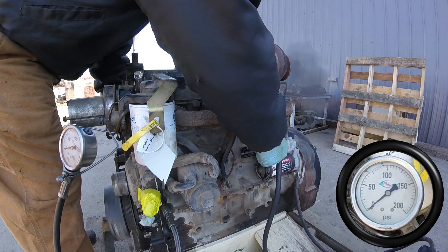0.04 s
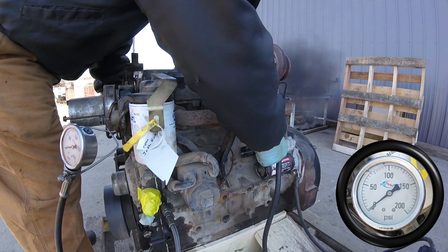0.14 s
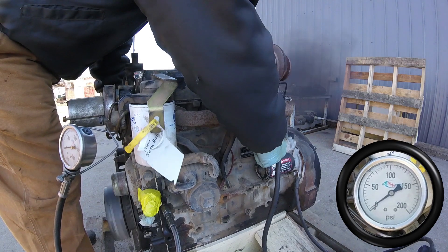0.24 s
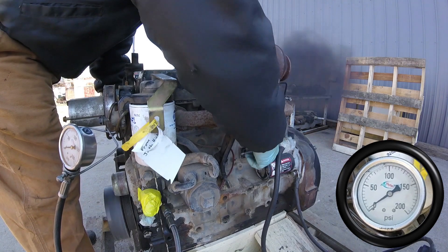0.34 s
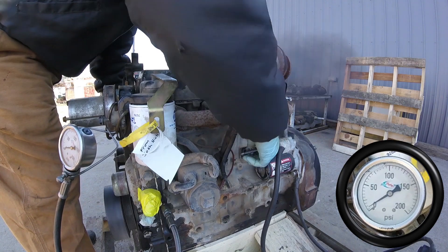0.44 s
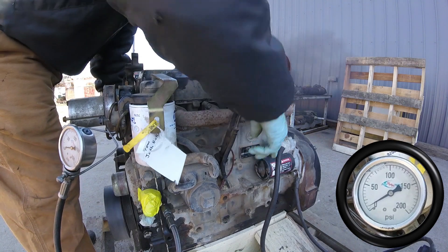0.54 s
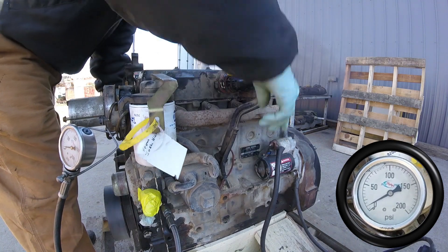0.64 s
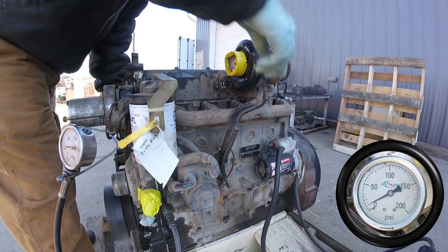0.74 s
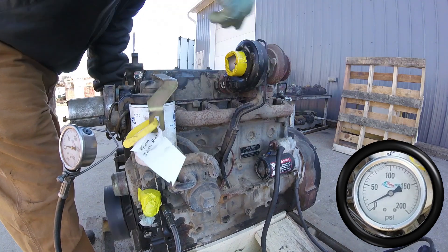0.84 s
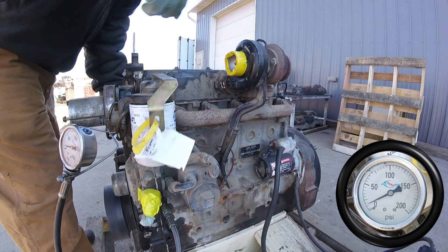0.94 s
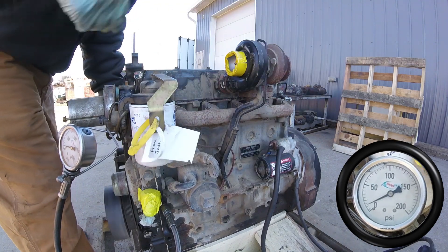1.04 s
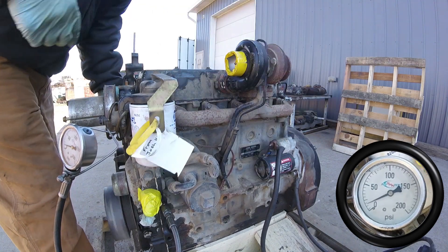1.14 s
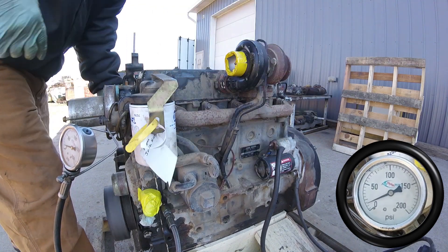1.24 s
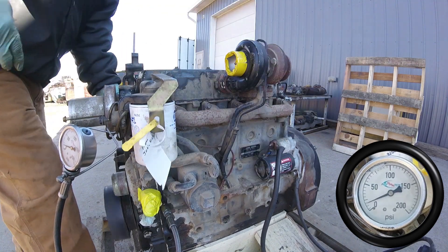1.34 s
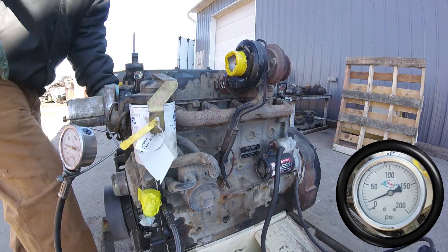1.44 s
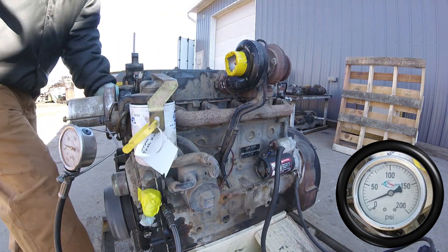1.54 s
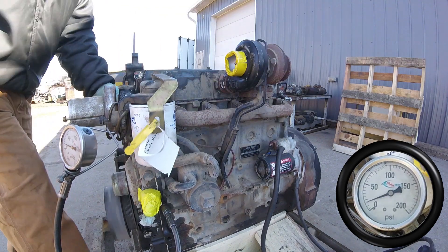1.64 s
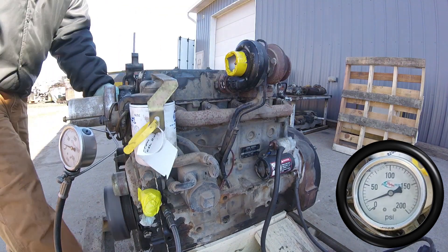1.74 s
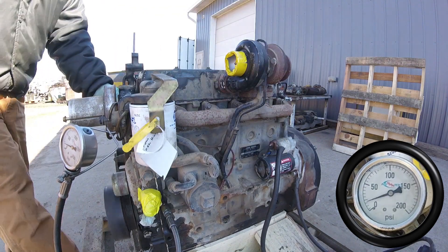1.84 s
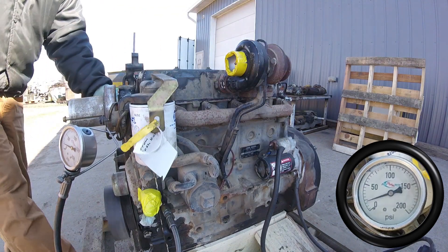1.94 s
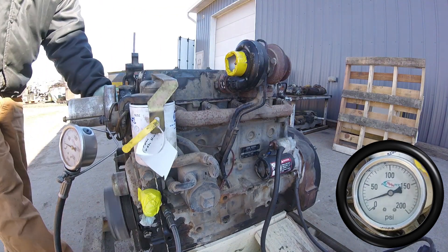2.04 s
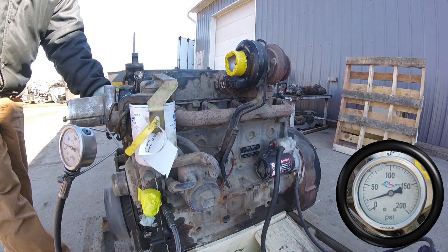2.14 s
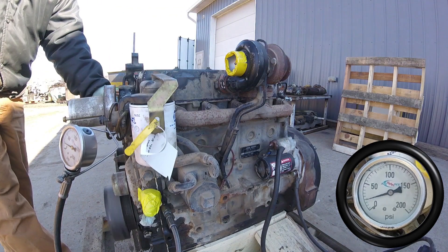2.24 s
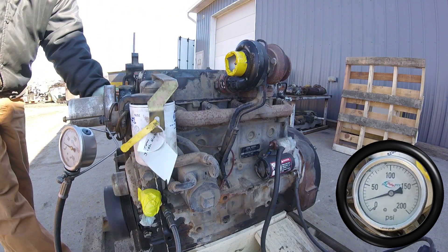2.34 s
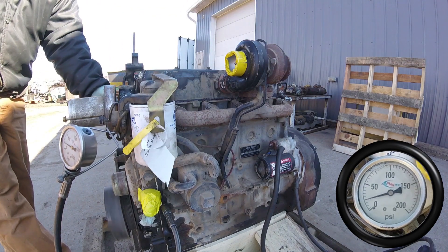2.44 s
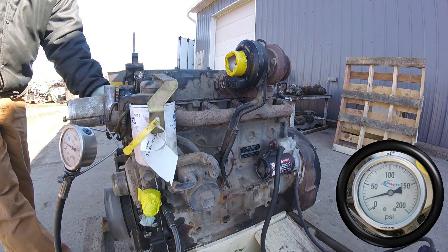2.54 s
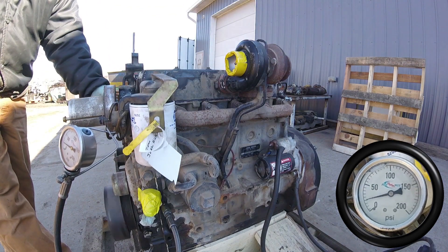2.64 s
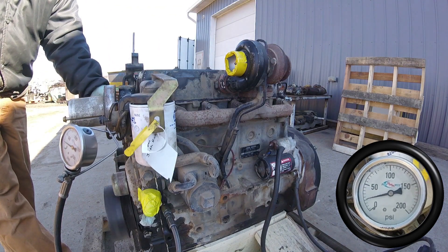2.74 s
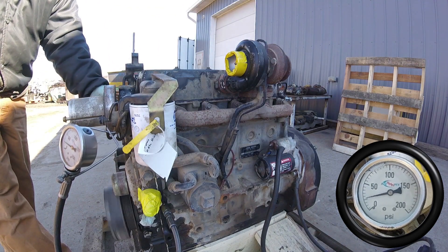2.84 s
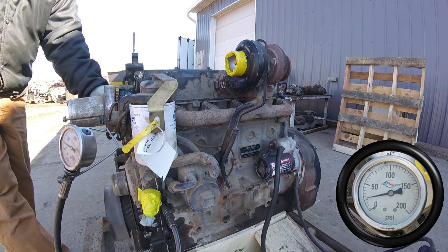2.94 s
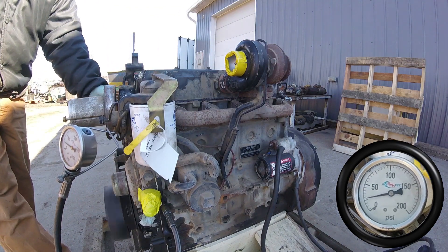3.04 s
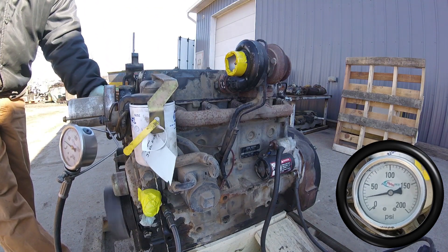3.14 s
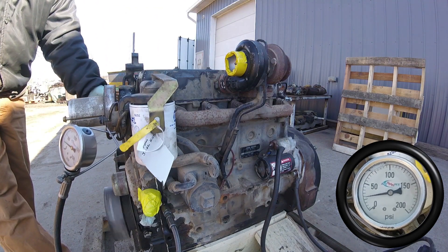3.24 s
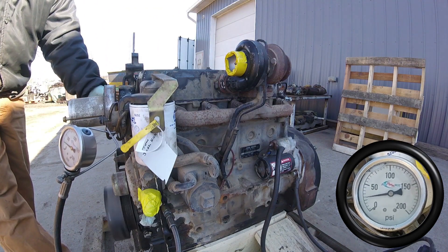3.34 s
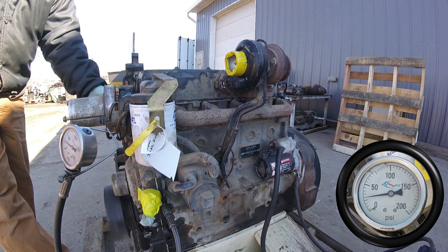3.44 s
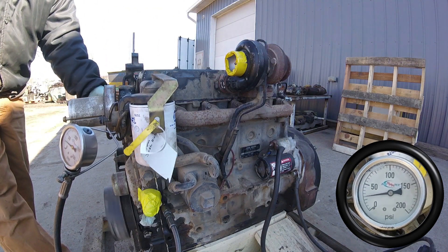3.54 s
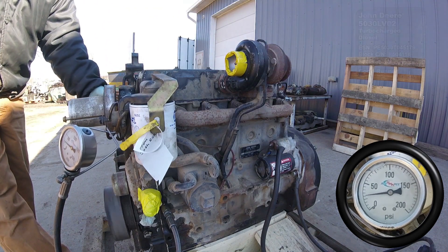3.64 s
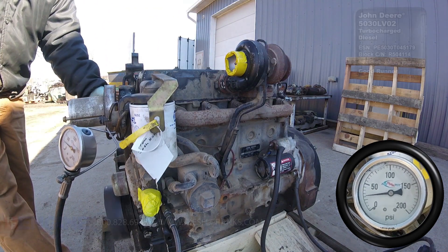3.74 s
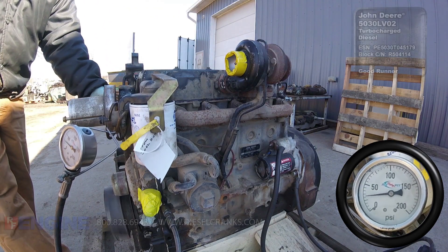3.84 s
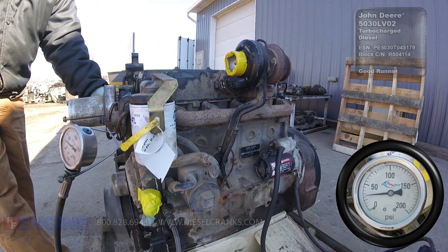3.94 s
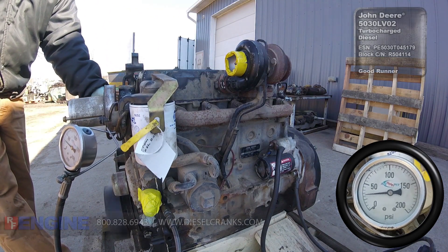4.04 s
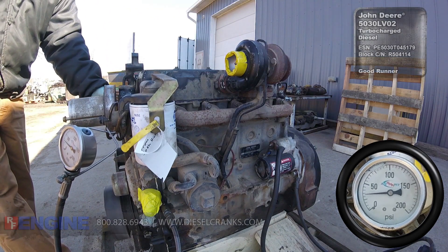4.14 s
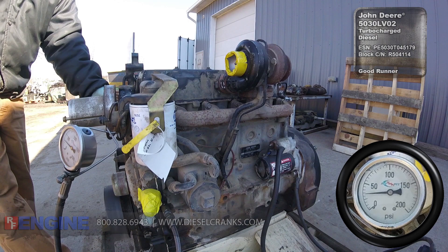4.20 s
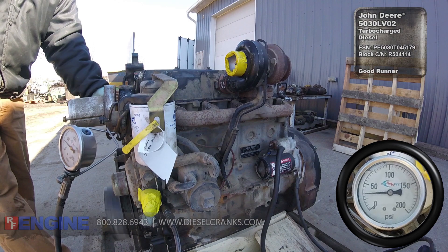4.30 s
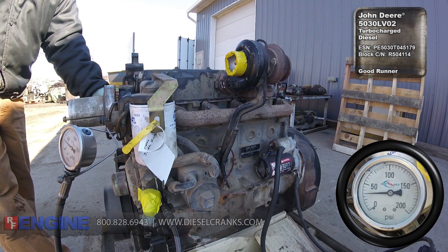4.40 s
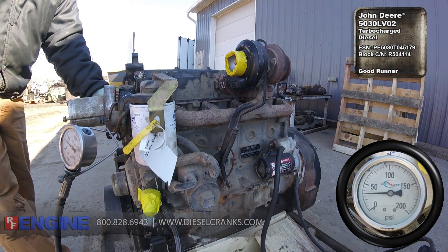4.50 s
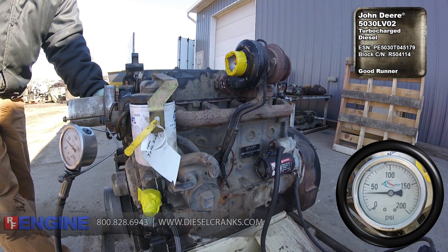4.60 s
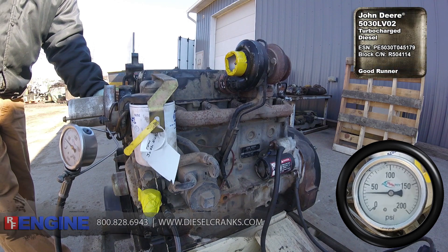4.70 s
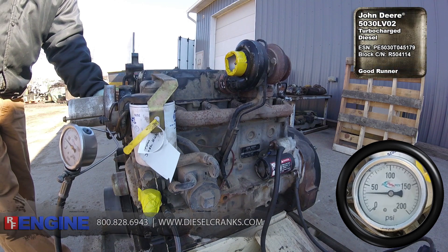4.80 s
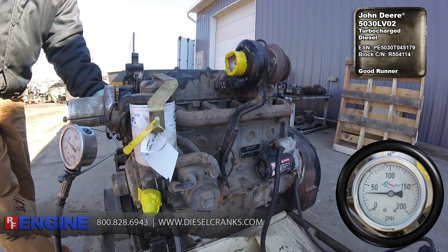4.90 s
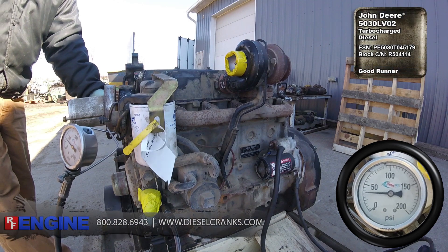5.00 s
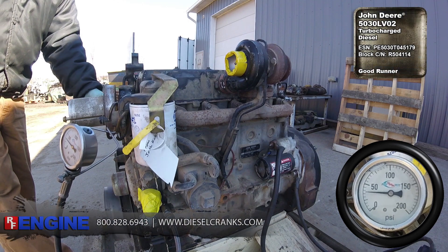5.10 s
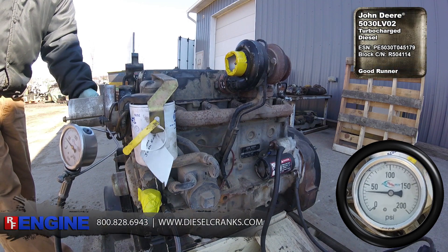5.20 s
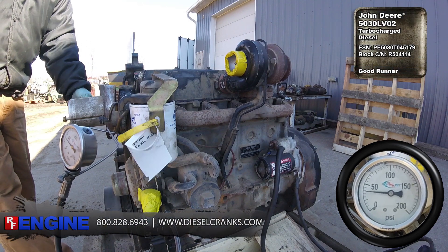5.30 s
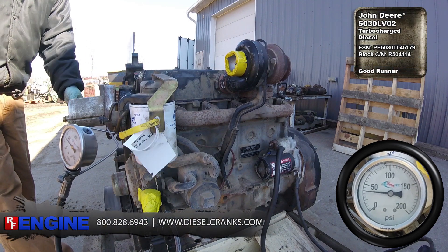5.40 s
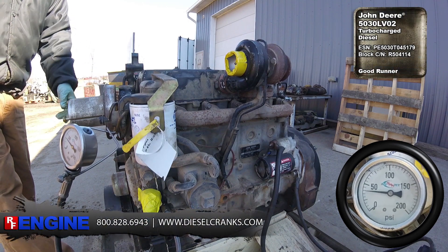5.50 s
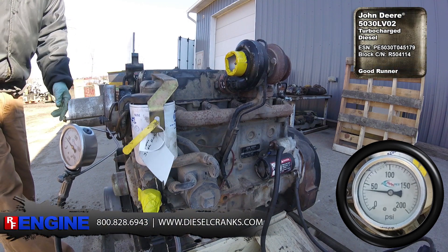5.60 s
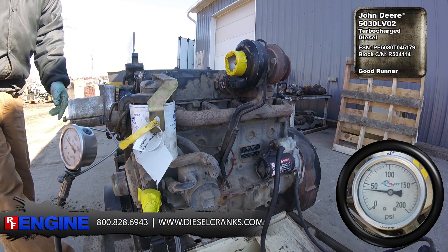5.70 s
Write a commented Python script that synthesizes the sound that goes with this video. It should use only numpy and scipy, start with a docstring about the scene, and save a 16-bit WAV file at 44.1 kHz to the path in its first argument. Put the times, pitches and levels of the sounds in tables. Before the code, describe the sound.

Close outdoor sound of a bare diesel engine starting beside a shed. Gear hiss and violent iron bangs quicken over the first third of a second, then the engine clatters fast, slows in two steps and settles. Uneven combustion knocks, gear churn, soft exhaust roar and crisp valve ticking continue to the end, with a heavy low hum swelling as speed drops. Echo is short; automatic gain dips at the start.

```python
"""A starter hisses and a dozen hard knocks ring out as a five-cylinder turbo diesel catches on a stand in a yard.
The speed curve overshoots, drops twice as the governor cuts it back, and sags to a clattering idle.
Bursts of noise and struck resonances make the knocks, clatter and ticks; sine waves make the low shaking.
As the engine slows, twice the firing rate nears a resonance at about 80 Hz and the whole rig booms.
A short yard echo follows the metal sounds, and a gain control ducks when the mids and treble are loud."""
import sys
import numpy as np
from scipy import signal
from scipy.fft import rfft, irfft, next_fast_len
from scipy.io import wavfile
from scipy.ndimage import uniform_filter1d, minimum_filter1d, map_coordinates

SR = 44100
rng = np.random.default_rng(int(sys.argv[2]) if len(sys.argv) > 2 else 0)


def unload_audio(sound):
    """Save the sound as a 16-bit wav file, at the path given as the first command line argument."""
    columns = np.transpose(np.atleast_2d(sound))
    # keep every value between -1 and 1, then stretch to whole-number steps
    steps = np.round(np.clip(columns, -1, 1) * 32767)
    wavfile.write(sys.argv[1], SR, steps.astype(np.int16))


N = 254016  # samples in the scene
CYLINDERS = 5  # one engine cycle is five firings


def amp(db):
    """Turn decibels into a gain."""
    return 10 ** (np.asarray(db) / 20)


def unit(x):
    """Scale to an rms of 1."""
    return x / np.sqrt(np.mean(x ** 2) + 1e-20)


def along(points, hz):
    """Read (f/Hz, value) points at any frequency, on a log axis."""
    f, value = np.transpose(points)
    return np.interp(np.log(hz + 1), np.log(f + 1), value)


def curves(rows):
    """Draw each column after the time as a line with one value per sample."""
    s, *columns = np.transpose(rows)
    return [np.interp(np.arange(N) / SR, s, column) for column in columns]


def wobble(rate):
    """A smooth random curve with `rate` random points a second."""
    points = rng.standard_normal(int(N * rate / SR) + 4)
    return map_coordinates(points, [np.arange(N) * rate / SR])


def coloured(x, gain):
    """Filter x by a gain curve over frequency, with the response starting at once, never early."""
    m = 2 * next_fast_len(N // 2 + SR // 4)
    log_gain = np.log(np.maximum(gain(np.fft.rfftfreq(m, 1 / SR)), 1e-6))
    # folding the cepstrum forward gives the minimum-phase filter
    cepstrum = irfft(log_gain)
    cepstrum[1:m // 2] *= 2
    cepstrum[m // 2 + 1:] = 0
    return irfft(rfft(x, m) * np.exp(rfft(cepstrum)))[:N]


def rings(table, hz):
    """Gain of resonances: each (f/Hz, width/Hz, level/dB) row raises or lowers a narrow band."""
    power = sum((amp(db) ** 2 - 1) / (1 + (2 * (hz - f) / width) ** 2) for f, width, db in table)
    return np.sqrt(1 + power.clip(-.5))


def strikes(times, sizes, shape):
    """Place a sized copy of shape at every time."""
    at = np.round(np.maximum(times, 0) * SR).astype(int)
    return signal.oaconvolve(np.bincount(at, sizes, N)[:N], shape)[:N]


def gated(crank, place, depth_db):
    """Noise that swells once for every firing."""
    swell_db = depth_db * np.cos(2 * np.pi * (crank - place))
    return unit(amp(swell_db) * rng.standard_normal(N))


def signature(fade):
    """One blow spreading through the iron: a dense burst, nearly even in spectrum, with energy 1."""
    spectrum = rfft(fade * rng.standard_normal(len(fade)))
    burst = irfft(spectrum / np.abs(spectrum), len(fade)) * fade ** 0.062
    return burst / np.linalg.norm(burst)


# hiss of the starter gears: (f/Hz, relative level/dB per Hz)
PINION_HISS = [(100, -13), (320, -11), (480, 5), (900, -7), (2000, -4), (4400, -4), (6300, -0.5),
               (10000, -18), (11700, -9), (13000, -22), (15000, -29)]
STARTER_DB, STARTER_OFF_S, STARTER_FALL_DB_PER_S = -35, 0.29, 90  # whirrs until it is let go


def starter(crank, depth_db=0.5):
    """The starter's pinion hisses on the flywheel, a little harder at each compression."""
    fade_db = STARTER_FALL_DB_PER_S * np.maximum(np.arange(N) / SR - STARTER_OFF_S, 0)
    hiss = coloured(gated(crank, place=0., depth_db=depth_db), lambda hz: amp(along(PINION_HISS, hz)))
    return amp(STARTER_DB - fade_db) * unit(hiss)


# full-fuel knocks as the engine catches: (t/s, level/dB)
CATCH_KNOCKS = [(.002, 0.5), (.043, 4.5), (.08, 2.5), (.111, 9), (.137, 11.5), (.162, 17.5), (.186, 13.5),
                (.212, 13.5), (.232, 14), (.251, 15), (.273, 12.5), (.289, 13.5)]
# broad response of the iron to those knocks: (f/Hz, relative level/dB per Hz)
HARD_RESPONSE = [(120, -49), (200, -4.5), (708, -22), (804, -14.5), (1290, -15.5), (1410, -1), (1570, 0.5),
                 (1720, -7.5), (2130, -1), (2750, -7), (3290, -5), (4640, -29.5), (6420, -15), (11900, -34),
                 (15000, -42)]
# castings that only the hardest firings wake: (f/Hz, width/Hz, level/dB against the broad response)
CASTING_RINGS = [(816, 23, 6), (1574, 110, 2.5), (2496, 34, -7), (2800, 44, 6.5), (3315, 49, 6),
                 (3500, 68, 1.5)]
# ringing of block and covers, used in full by the clatter below: (f/Hz, width/Hz, level/dB)
BLOCK_RINGS = [(810, 30, 10.5), (1090, 63, 18), (1396, 53, 10), (1576, 64, 8.5), (1859, 37, 14),
               (2184, 63, 7.5), (2374, 47, 8), (2688, 37, 9), (3300, 320, 8), (4155, 126, 14)]


def catch(rebound_s=.0048, crash_t60=0.027, grit_db=-3, thump_db=-12, thump_hz=88, thump_t60=0.061):
    """Cold fuel goes off all at once: each firing strikes three times in a row and thumps the stand."""
    t = np.arange(SR // 10) / SR
    fade = amp(-60 * t / crash_t60)
    s, db = np.transpose(CATCH_KNOCKS)
    crash = np.zeros(N)
    for start, size in zip(s, amp(db)):
        for k in range(3):
            strike_s = start + k * rebound_s + .0005 * rng.standard_normal()
            at = round(max(strike_s, 0) * SR)
            grit = amp(grit_db) * fade / np.linalg.norm(fade) * rng.standard_normal(len(t))
            crash[at:at + len(t)] += size * amp(-1.2 * k) * (signature(fade) + grit)

    def iron(hz):
        ringing = rings(BLOCK_RINGS, hz) ** 0.53 * rings(CASTING_RINGS, hz)
        return unit(amp(along(HARD_RESPONSE, hz)) * ringing)

    crash = coloured(crash, iron)
    onset = 1 - np.exp(-t / 0.0065)
    thump = -np.sin(2 * np.pi * thump_hz * t) * amp(-60 * t / thump_t60) * onset
    # the thump grows half as fast in dB as the crash
    return crash + strikes(s, amp(thump_db + db / 2), thump)


# combustion, piston slap and rebound of every firing: (delay/firings, hardness 0-1)
STROKE_BLOWS = [(.01, .85), (.17, .15), (.39, .35)]
# cylinders in firing order: (lateness/firings, combustion level/dB, slap level/dB, rebound level/dB)
CYLINDER_BLOWS = [(-0.0149, -3.5, 2.5, -11), (0.0249, 3, 0.5, -7.5), (0.00057, -2, 4.5, -2),
                  (-0.0122, -26, -4.5, -2.5), (.045, -10, -2.5, -1.5)]


def blows():
    """List every blow of one engine cycle: (place in firings, level in dB, hardness)."""
    return [(k + late + delay, db, hardness) for k, (late, *levels) in enumerate(CYLINDER_BLOWS)
            for (delay, hardness), db in zip(STROKE_BLOWS, levels)]


def knocks(crank, blow_t60=0.024, soft_hz=2000, thin_hz=1000):
    """Each blow returns once a cycle, partly with its own signature, partly as fresh rattle."""
    scatter_db, jitter_s = 1., .00007
    repeat = .72  # share of the power that is alike in every cycle
    fade = amp(-60 * np.arange(SR // 25) / SR / blow_t60)
    hard, soft = np.zeros((2, N))
    for place, db, hardness in blows():
        turns = np.arange(place, crank[-1], CYLINDERS)
        chance = rng.standard_normal((64, 2))[:len(turns)]
        times = np.interp(turns, crank, np.arange(N) / SR) + jitter_s * chance[:, 0]
        sizes = amp(db + scatter_db * chance[:, 1])
        rattle = strikes(times, sizes, fade / np.linalg.norm(fade)) * rng.standard_normal(N)
        same = strikes(times, sizes, signature(fade))
        blow = np.sqrt(repeat) * same + np.sqrt(1 - repeat) * rattle
        hard_share = np.clip(hardness, 0, 1)
        hard += hard_share * blow
        soft += (1 - hard_share) * blow
    # a slap through the oil film has little treble
    soft = irfft(rfft(soft) / np.hypot(1, (np.fft.rfftfreq(N, 1 / SR) / soft_hz) ** 4), N)
    # such short blows hardly move the block at low pitch
    return coloured(hard + soft, lambda hz: 1 / np.hypot(1, (thin_hz / (hz + 1)) ** 2))


# sheet covers that the strongest slaps set ringing: (f/Hz, level/dB, t60/s)
COVER_TONES = [(1440, -6.5, 0.052), (1614, 5.5, 0.027), (1887, -6.5, 0.12)]


def covers(crank):
    """The harder a slap, the far stronger the covers ring, nearly alike in every cycle."""
    t = np.arange(SR // 8) / SR
    ring = sum(amp(db - 60 * t / t60) * np.sin(2 * np.pi * hz * t) for hz, db, t60 in COVER_TONES)
    ring = ring * np.minimum(t / t[SR // 1000], 1)  # start over 1 ms, without a click
    out = np.zeros(N)
    for place, db, hardness in blows():
        times = np.interp(np.arange(place, crank[-1], CYLINDERS), crank, np.arange(N) / SR)
        scatter_db = .7 * rng.standard_normal(64)[:len(times)]
        # doubling the dB makes strong blows stand out; soft blows count most
        sizes = amp(2 * db + scatter_db) * (1 - np.clip(hardness, 0, 1))
        out += strikes(times, sizes, ring)
    return unit(out)


# broad response of the engine block: (f/Hz, relative level/dB per Hz)
BLOCK_RESPONSE = [(60, -31), (150, -11), (300, -14.5), (600, -9), (950, -18), (1270, -22.5), (1430, 0),
                  (2300, -0.5), (2900, -4.5), (3450, -8), (3800, -12.5), (4500, -24), (7000, -22.5),
                  (15000, -65)]


def clatter(crank, knock_db, gears_db=-8, covers_db=-3):
    """Knocks and the churn of the timing gears ring the block."""
    def iron(x):
        return unit(coloured(x, lambda hz: amp(along(BLOCK_RESPONSE, hz)) * rings(BLOCK_RINGS, hz)))

    gears = amp(gears_db) * iron(gated(crank, place=0.32, depth_db=2.5))
    struck = unit(iron(knocks(crank)) + amp(covers_db) * covers(crank))
    both = amp(knock_db) * struck + gears
    # knock_db shifts the balance, not the overall level
    return both / np.hypot(amp(knock_db), amp(gears_db))


# hollow roar of sump and exhaust: (f/Hz, relative level/dB per Hz)
ROAR_RESPONSE = [(25, -26), (60, -3), (130, 1.5), (210, 4), (310, -11), (430, 0.5), (620, -4), (700, -5),
                 (850, -7), (1100, -0.5), (1300, -33), (2000, -30.5)]


def roar(crank, roar_db=-15):
    """A soft low rush under the clatter, puffing with the firings."""
    puffs = gated(crank, place=0.21, depth_db=4.0)
    return amp(roar_db) * unit(coloured(puffs, lambda hz: amp(along(ROAR_RESPONSE, hz))))


# broad response of the valve gear: (f/Hz, relative level/dB per Hz)
VALVE_RESPONSE = [(3000, -24), (4600, -12.5), (5600, -11), (6000, -1), (6500, -3.5), (6950, -18.5),
                  (7800, -9.5), (8500, -10.5), (9050, -7.5), (10000, -18.5), (10400, -14), (11050, -25.5),
                  (11600, -19.5), (13000, -29), (15000, -43)]
# ringing of injector lines and rocker cover: (f/Hz, width/Hz, level/dB above the broad response)
VALVE_TONES = [(5145, 67, 7.5), (5570, 33, 10.5), (5940, 69, 5.5), (6400, 120, 5), (7010, 80, 9),
               (7470, 110, 5.5), (8200, 120, 2.5), (9100, 100, 4.5)]


def valve_gear(crank, grain_db=1.5, cycle_db=0.55):
    """Injectors and rockers tick in a bright cluster at every firing, the nearest cylinders loudest."""
    near = amp(cycle_db * np.cos(2 * np.pi * (crank - 1.8) / CYLINDERS))
    ticks = gated(crank, place=0.17, depth_db=4.0) * near * amp(grain_db * wobble(600))
    return unit(coloured(ticks, lambda hz: amp(along(VALVE_RESPONSE, hz)) * rings(VALVE_TONES, hz)))


# even shaking and exhaust pulses: (multiple of the firing rate, level/dB)
EVEN_ORDERS = [(1, -36.5), (2, -37.5), (3, -51.5), (4, -81.5), (5, -88), (6, -55), (9, -59)]
# shaking from unequal cylinders: (multiple of the cycle rate, level/dB)
UNEVEN_ORDERS = [(4, -46), (8, -61), (9, -55), (11, -62), (18, -60), (19, -62), (21, -60), (22, -61),
                 (23, -53), (24, -59), (29, -61), (31, -61)]
# overtones of the rig at full boom: (multiple of the firing rate, level/dB)
BUZZ_ORDERS = [(3, -44), (4, -40), (5, -54.5), (7, -45.5), (8, -52), (9, -53), (11, -49.5)]
# laws of the shaking: (level/dB at idle, dB per firing a second above idle, dB per idle dose of extra fuel)
EVEN_FORCE_LAW = (.3, -.3, 1.1)  # even force on the rig's resonance
UNEVEN_FORCE_LAW = (-11, 2.4, 1)  # uneven force on the rig's resonance
EVEN_MOUNT_LAW = (0.27, -0.42, 1.5)  # even shaking that the mounts let through
UNEVEN_LOPE_LAW = (-5, 0.78, 1)  # uneven shaking heard directly


def shaking(crank, level, boom_hz=79.97, width_hz=3.07, boom_db=25.5, buzz_db=0):
    """Low tones follow the crank; one that nears the rig's resonance booms and brings overtones."""
    def tone(k, db):
        return np.sqrt(2) * amp(db + 0.49 * wobble(14)) * np.sin(2 * np.pi * k * (crank - .5))

    even = sum(tone(round(k), db) for k, db in EVEN_ORDERS)
    uneven = sum(tone(round(k) / CYLINDERS, db + wobble(4.46)) for k, db in UNEVEN_ORDERS)
    force = amp(level(EVEN_FORCE_LAW)) * even + amp(level(UNEVEN_FORCE_LAW)) * uneven

    def resonance(hz):
        peak = amp(boom_db) / np.hypot(1, (hz ** 2 - boom_hz ** 2) / (width_hz * hz + 1e-6))
        # keep the boom to a band around the peak
        skirts = np.hypot(1, (hz / 115) ** 6) * np.hypot(1, (55 / (hz + 1)) ** 6)
        return peak / skirts

    boom = coloured(force, resonance)
    swing = np.sqrt(np.abs(uniform_filter1d(boom ** 2, SR // 10)))
    # the higher overtones throb once a cycle, with the strongest cylinder
    throb = .7 * np.cos(2 * np.pi * (crank - 1.6) / CYLINDERS)
    buzz = sum(tone(round(k), db) * (1 + throb * (k > CYLINDERS)) for k, db in BUZZ_ORDERS)
    buzz = amp(buzz_db) * swing / swing.max() * buzz
    direct = amp(level(EVEN_MOUNT_LAW)) * even + amp(level(UNEVEN_LOPE_LAW)) * uneven
    return direct + boom + buzz


# how long the yard's echo lasts: (f/Hz, t60/s)
YARD_DECAY = [(100, 0.67), (2000, 0.34), (10000, 0.2)]


def yard(x):
    """The shed wall and the ground scatter a short tail, made of noise that fades faster in the treble."""
    hz, t, noise = signal.stft(rng.standard_normal(SR // 2), SR, nperseg=256)
    fading = noise * amp(-60 * t / along(YARD_DECAY, hz)[:, None])
    tail = signal.istft(fading, SR, nperseg=256)[1]
    late_tail = np.pad(tail, (SR // 100, 0))  # starts 10 ms late
    return signal.fftconvolve(x, late_tail / np.linalg.norm(tail))[:N]


IDLE_RATE = 43  # firings per second
COAST_DROP = 37  # firings per second lost each second with the fuel cut
FUEL_LEAD_S, FUEL_EASE_S = 0.017, 0.1  # fuel leads the speed and moves smoothly
FUEL_MOST = 1.1  # ceiling of the dose, idle = 1


def fuel(speed):
    """The dose, idle = 1: more while the engine gains speed, down to none as it falls fast."""
    speed_gain = uniform_filter1d(np.gradient(speed) * SR, max(int(FUEL_EASE_S * SR), 1))
    t = np.arange(N) / SR
    return np.clip(1 + np.interp(t + FUEL_LEAD_S, t, speed_gain) / COAST_DROP, 0, FUEL_MOST)


# crank speed, with run-up, overshoot, two cuts by the governor and a slow sag: (t/s, firings per second)
CRANK_SPEED = [(0, 21.18), (.3, 55.48), (.53, 49.85), (.81, 52.0), (1.0, 45.7), (1.13, 42.0), (1.22, 43.9),
               (1.32, 44.31), (1.89, 45.49), (2.66, 42.93), (4.14, 42.15), (4.71, 40.24), (5.76, 39.36)]
# laws of the metal: (level/dB at idle, dB per firing a second above idle, dB per idle dose of extra fuel)
BLOCK_LAW = (-29, 0.24, 3.5)  # clatter and roar together
VALVE_GEAR_LAW = (-41.5, 0.45, 0.48)
KNOCK_BALANCE_LAW = (-6.5, -0.37, 7.2)  # knocks against gear churn
# the laws follow the speed only this far: (lowest, highest) in firings a second from idle
SPEED_LIMITS = (-4, 8)


def scene():
    """One crankshaft times the engine; its speed and the fuel set the running levels."""
    speed, = curves(CRANK_SPEED)
    crank = np.cumsum(speed) / SR  # firings so far
    extra_fuel = fuel(speed) - 1

    def level(law):
        at_idle, per_speed, per_fuel = law
        return at_idle + per_speed * np.clip(speed - IDLE_RATE, *SPEED_LIMITS) + per_fuel * extra_fuel

    starting = starter(crank) + catch()
    block = amp(level(BLOCK_LAW)) * (clatter(crank, level(KNOCK_BALANCE_LAW)) + roar(crank))
    metal = starting + block + amp(level(VALVE_GEAR_LAW)) * valve_gear(crank)
    return (metal + amp(-12.5) * yard(metal) + shaking(crank, level))[None]


AGC_DB, AGC_SHARE = -20, 0.68  # threshold, share of the excess dB removed
AGC_ATTACK_S, AGC_HOLD_S, AGC_RELEASE_DB_PER_S = 0.024, 0.087, 42


def gain_control(x, deaf_below_hz=400):
    """Loud mids and treble push the gain down; it holds, then creeps back."""
    heard = coloured(x, lambda hz: 1 / np.hypot(1, (deaf_below_hz / (hz + 1)) ** 3))
    keep = np.exp(-1 / (AGC_ATTACK_S * SR))
    power = signal.lfilter([1 - keep], [1, -keep], heard ** 2)
    gain_db = -AGC_SHARE * np.maximum(10 * np.log10(power + 1e-12) - AGC_DB, 0)
    half = int(AGC_HOLD_S * SR / 2)
    held = minimum_filter1d(gain_db, 2 * half + 1, origin=half, mode="nearest")
    # the gain may rise no faster than this ramp
    ramp = AGC_RELEASE_DB_PER_S * np.arange(N) / SR
    return x * amp(np.minimum.accumulate(held - ramp) + ramp)


TOP_HZ = 15100  # band limit


def record(dry):
    """The gain control ducks under loud sounds, and nothing above the band limit is kept."""
    m = next_fast_len(N + SR // 4)
    spectrum = rfft(gain_control(dry[0]), m)
    return irfft(spectrum * (np.fft.rfftfreq(m, 1 / SR) < TOP_HZ), m)[None, :N]


dry = scene()
out = record(dry)
unload_audio(out)
```